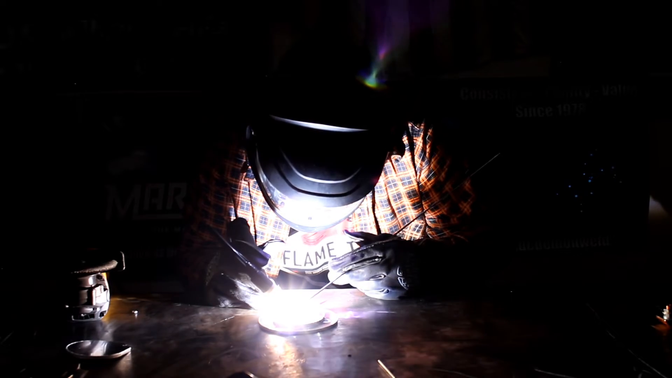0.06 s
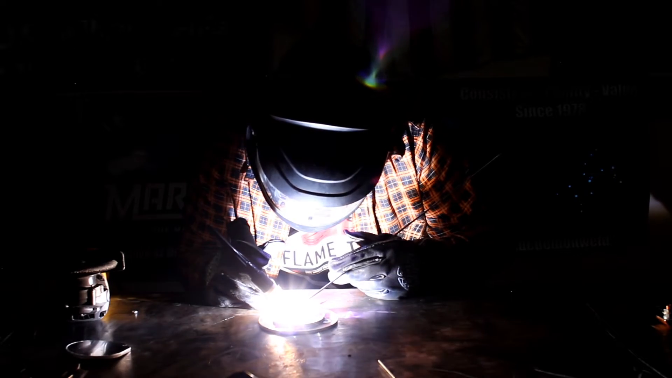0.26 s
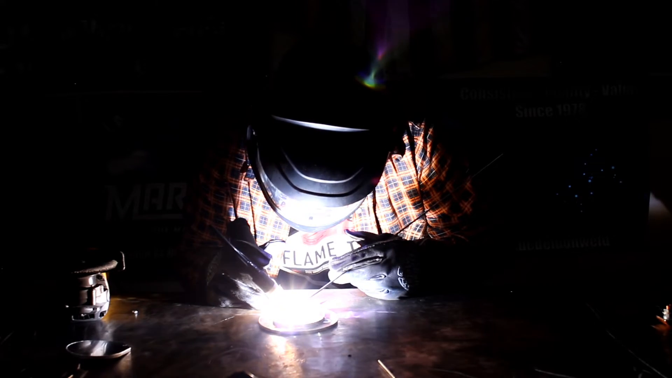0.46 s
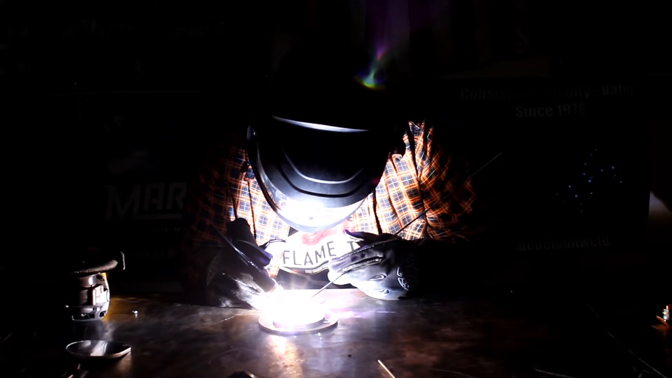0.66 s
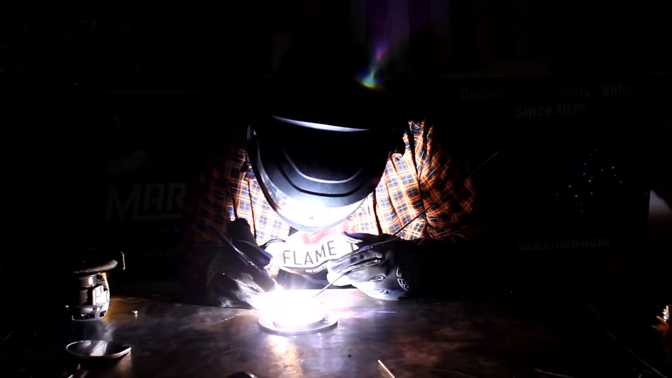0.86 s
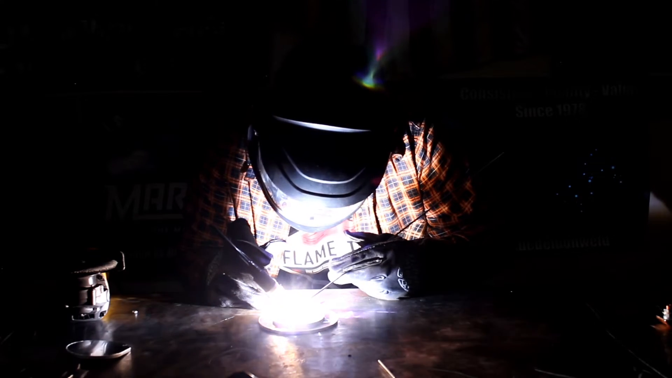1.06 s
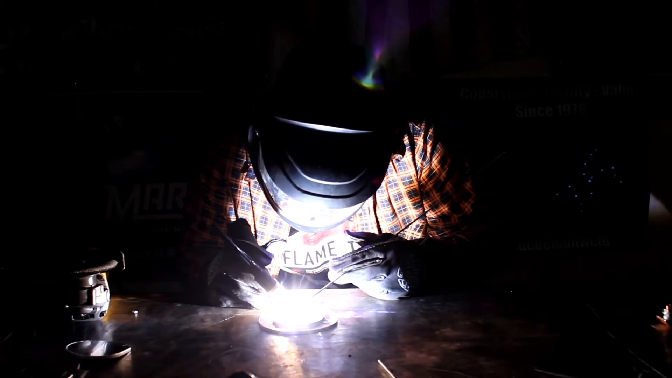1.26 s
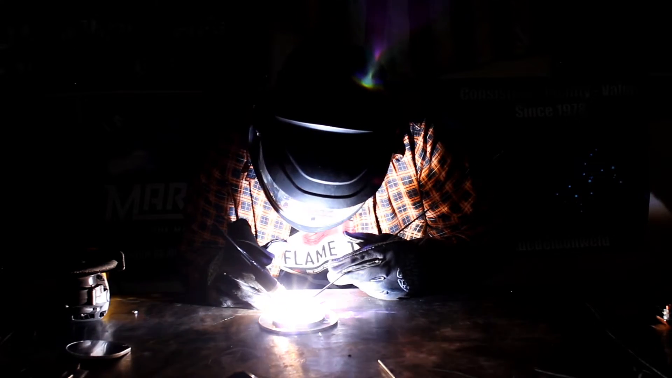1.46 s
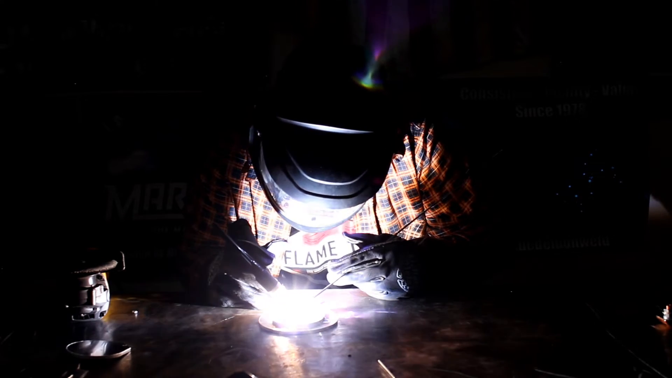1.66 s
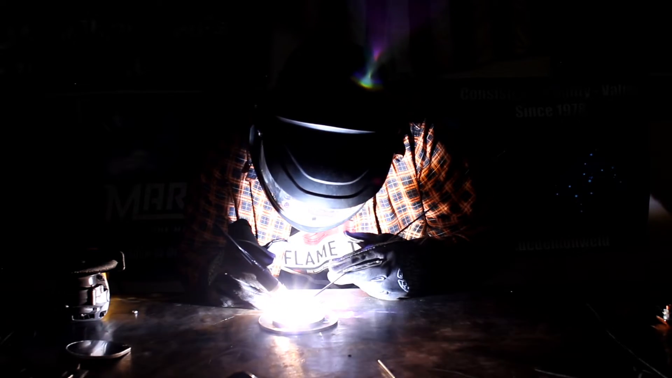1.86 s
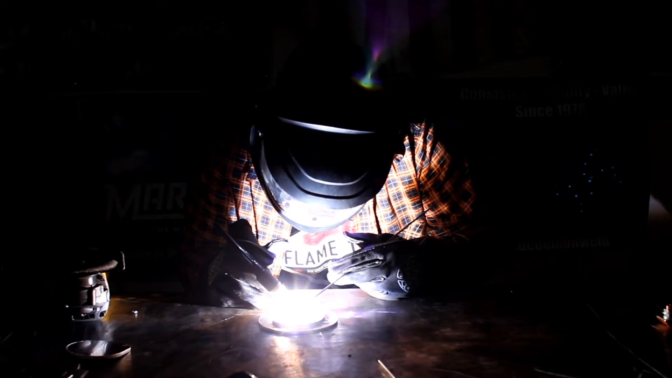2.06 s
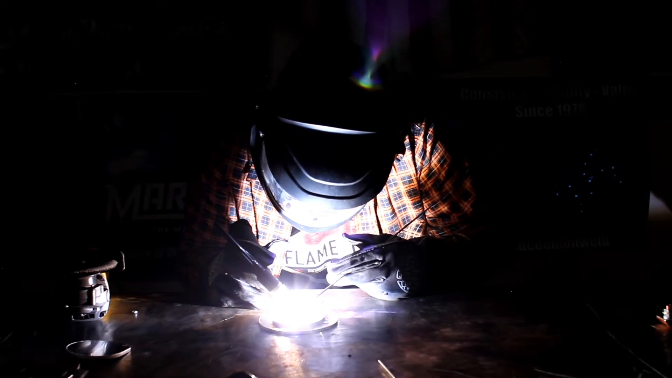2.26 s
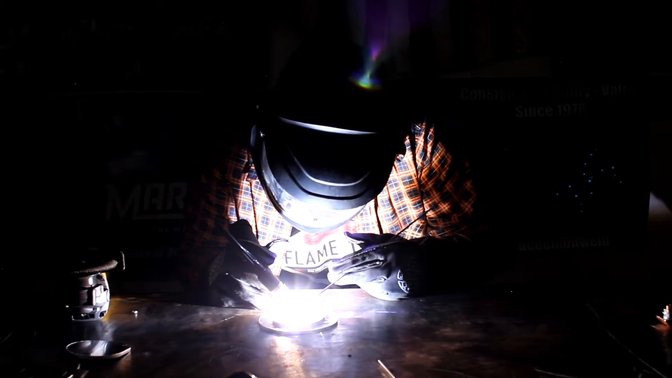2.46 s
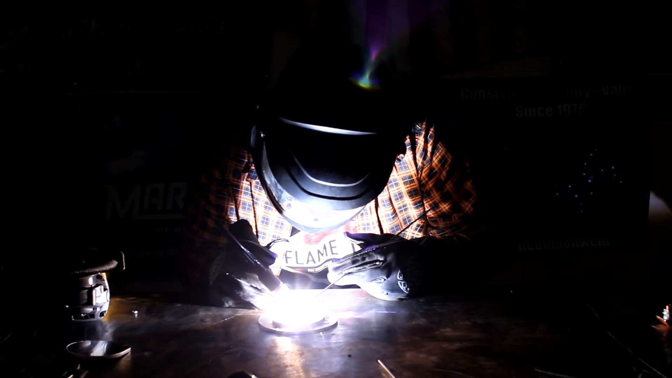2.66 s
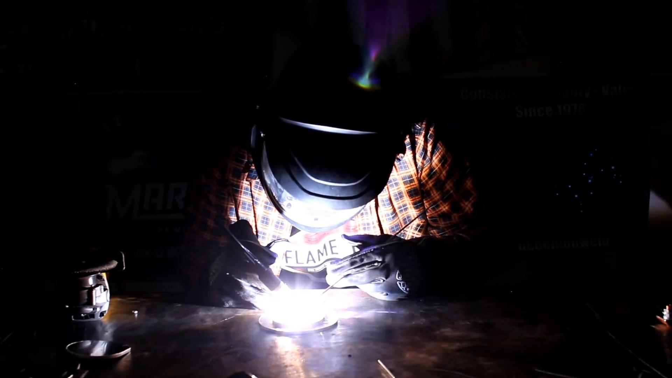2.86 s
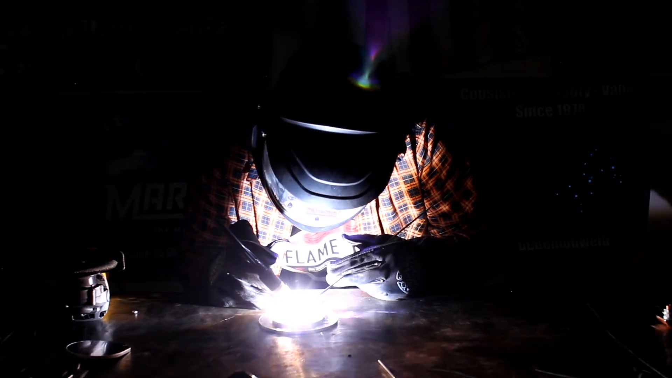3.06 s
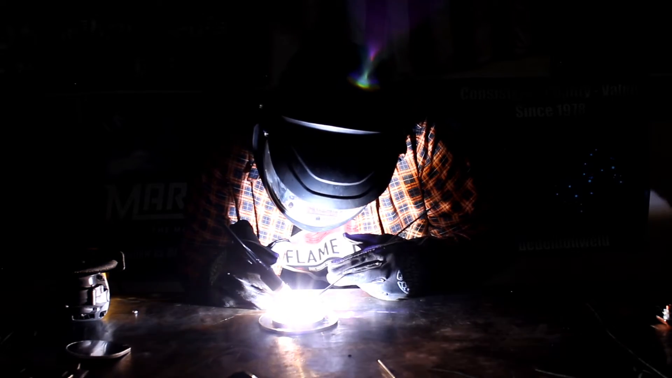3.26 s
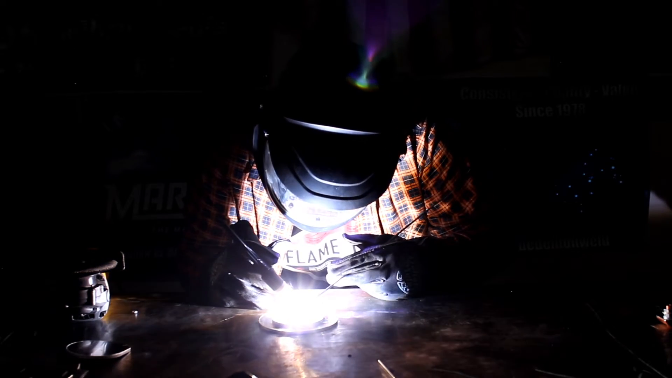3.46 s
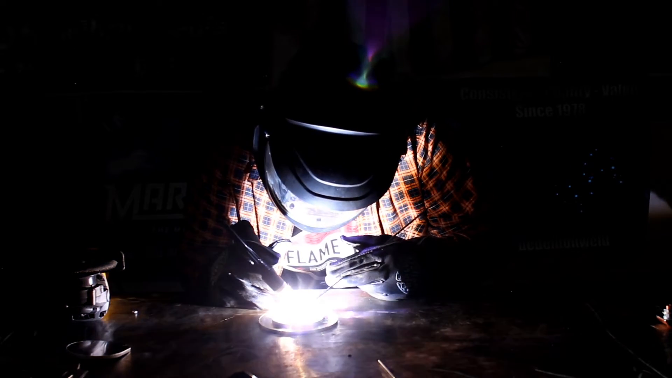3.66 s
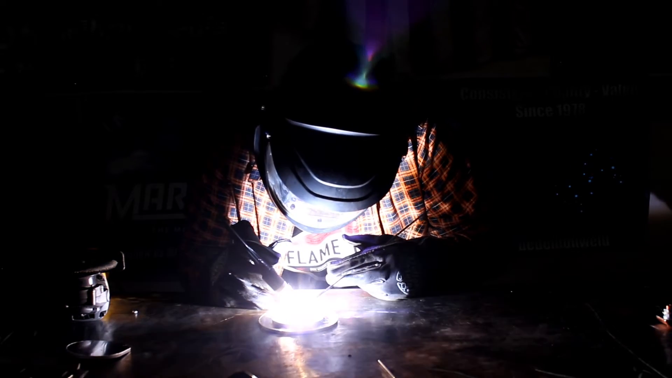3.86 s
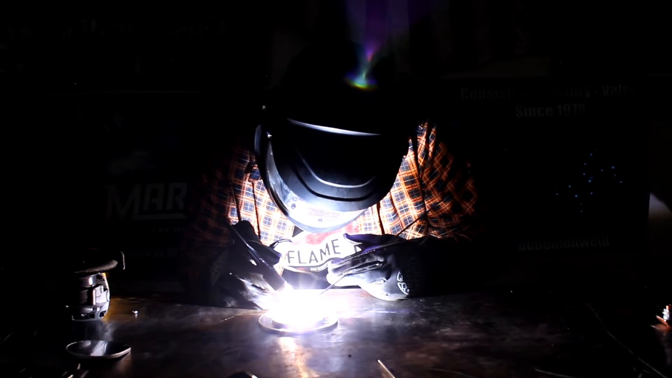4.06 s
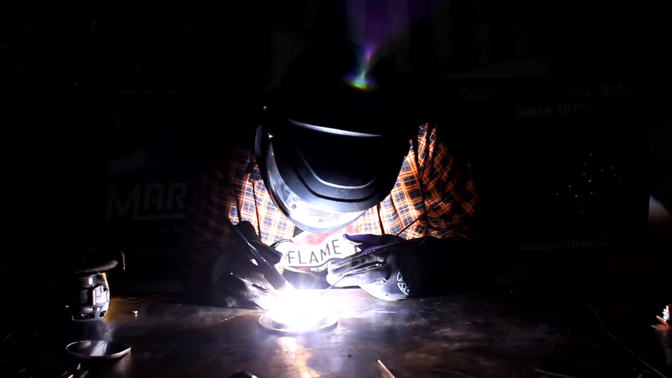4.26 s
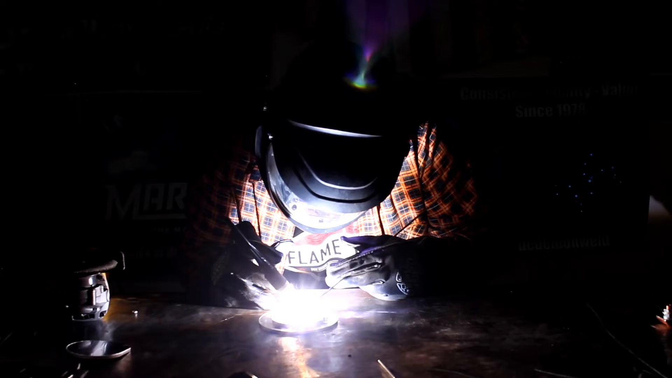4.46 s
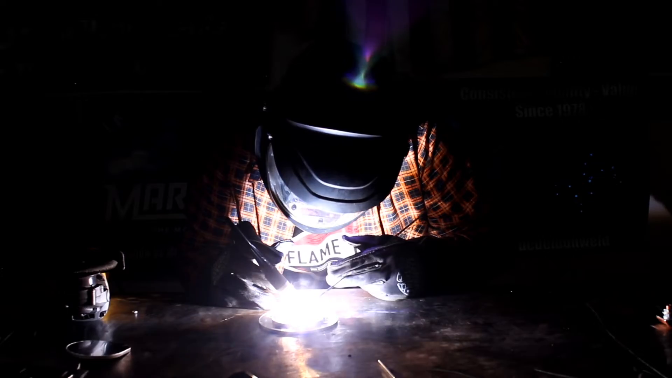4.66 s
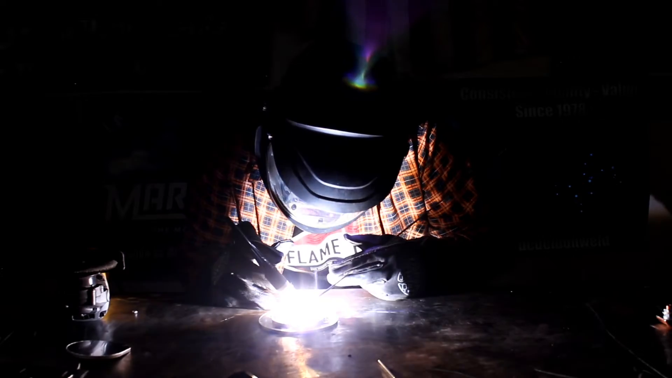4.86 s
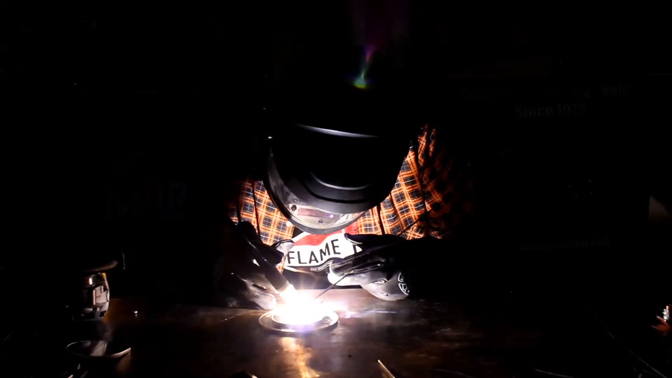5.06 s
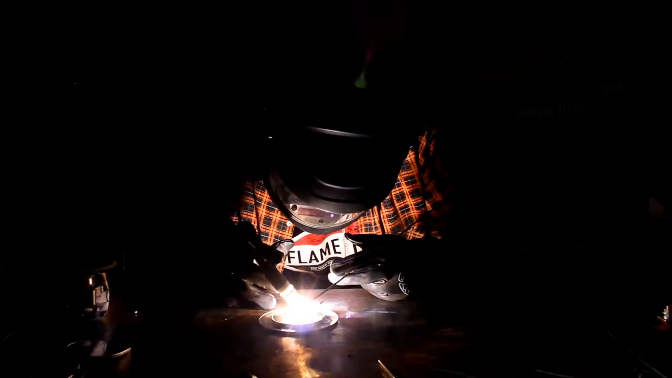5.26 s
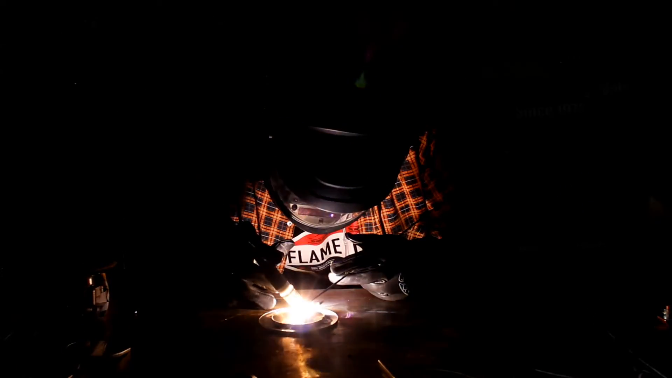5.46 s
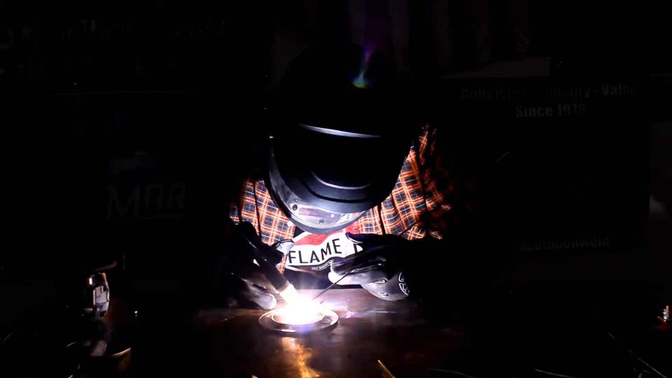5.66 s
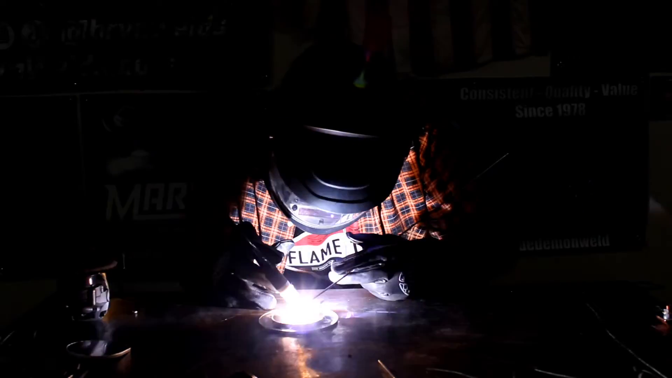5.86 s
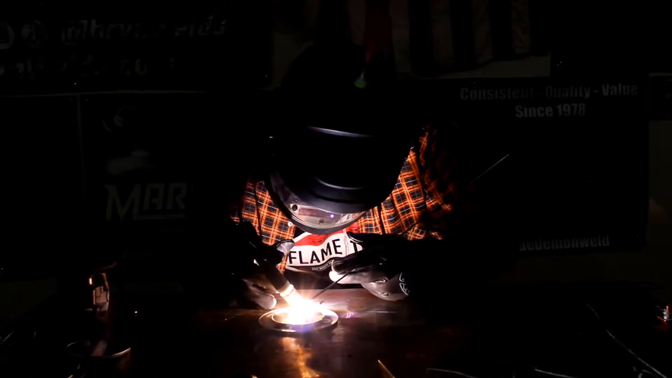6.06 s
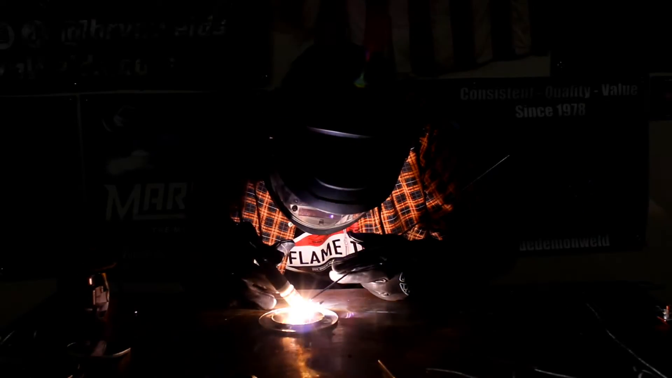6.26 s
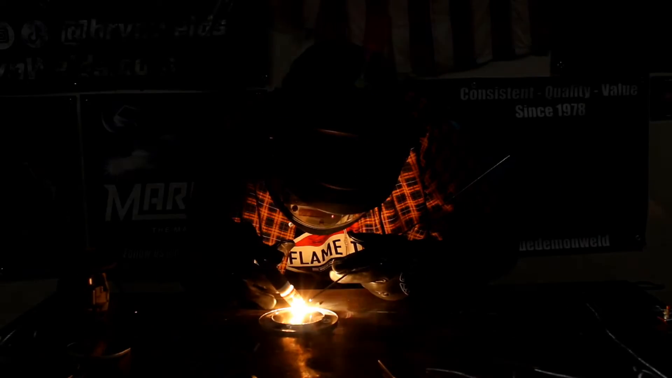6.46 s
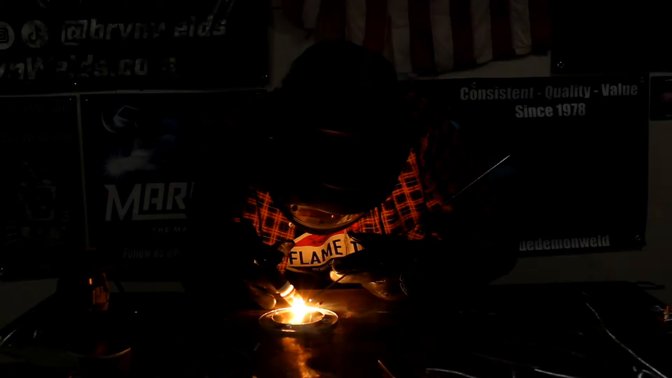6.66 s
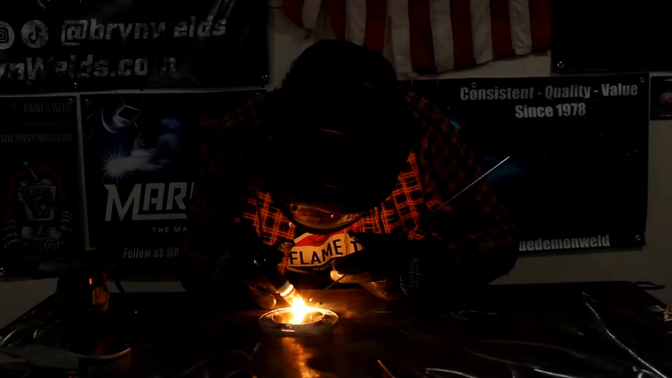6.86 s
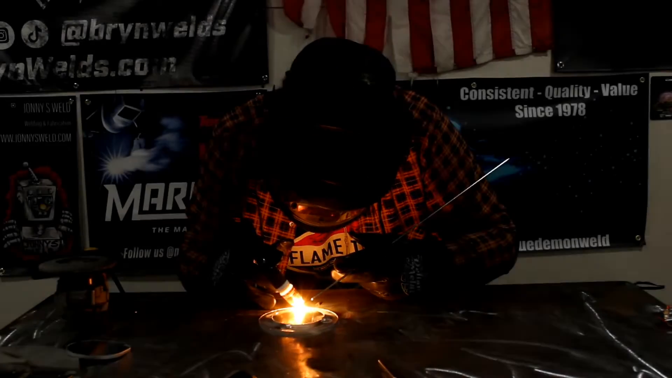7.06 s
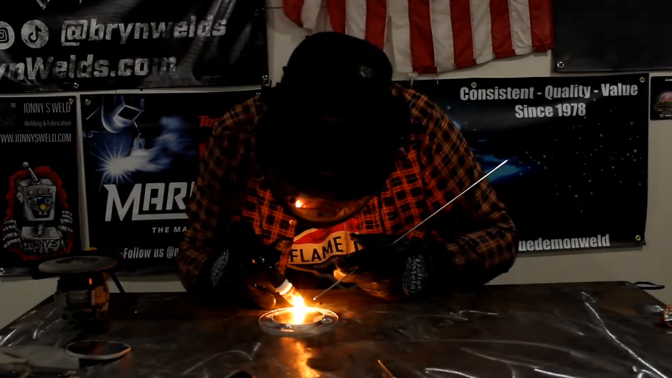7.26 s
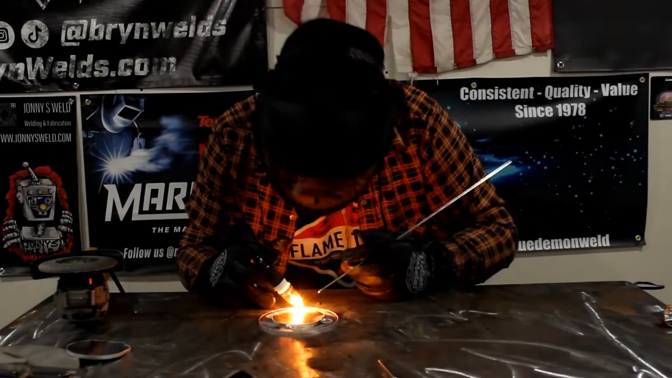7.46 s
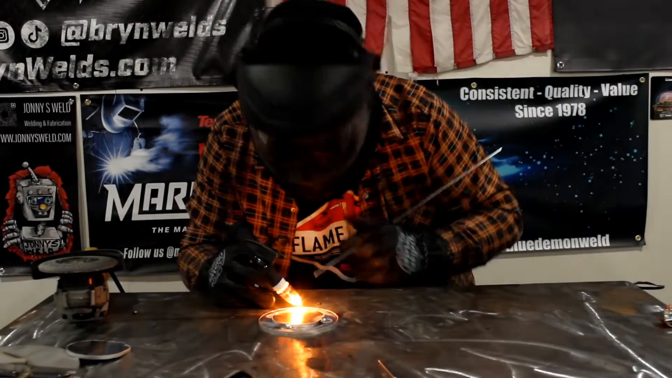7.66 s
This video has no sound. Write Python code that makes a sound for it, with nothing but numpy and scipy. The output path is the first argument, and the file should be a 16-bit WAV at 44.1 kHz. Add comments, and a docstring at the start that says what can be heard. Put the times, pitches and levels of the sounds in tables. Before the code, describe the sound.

Raspy electric welding buzz with crackling spits holds for five seconds, breaks into uneven snapping, cuts out, leaving a rising fan hum.

```python
"""AC welding arc and fan

An AC TIG arc buzzes on a steel bench, cracking at both polarity reversals of each 90 Hz cycle.
Filtered impulses make its cracks, decaying modes its rings and phase-locked harmonics its buzz.
Soft bumps sound on the bench, and the pool spits as the filler rod dips. As the current is eased
off, the arc sputters, restrikes with sharp snaps and goes out. Gain control, held down by the arc,
then lets a machine fan swell up: filtered noise for its rush, slightly unsteady sines for its hum."""
import sys
import numpy as np
from scipy import signal
from scipy.fft import rfft, irfft, next_fast_len
from scipy.io import wavfile
from scipy.ndimage import uniform_filter1d, minimum_filter1d, map_coordinates

SR = 44100
rng = np.random.default_rng(int(sys.argv[2]) if len(sys.argv) > 2 else 0)


def waveform_to_disk(signal):
    """Save audio, clipped to [-1, 1], as 16-bit WAV at the path in sys.argv[1]."""
    frames = np.transpose(np.atleast_2d(signal))
    scaled = np.clip(frames, -1, 1) * 32767
    samples = np.round(scaled).astype(np.int16)
    wavfile.write(sys.argv[1], SR, samples)


N = 340893

ARC_HZ = 90.19
GAIN_RANGE_DB = 16  # the most that the gain control can turn down
CRACK_LEAD_S = 0.0001497  # the crack opens each reversal
FADE_S = 0.133  # the arc's changes of state fade over this time

# the two changes of polarity within a cycle: t/s
POLARITY_CHANGES = [.0038, .0105]
# the torch passes the start, middle and end of the seam: t/s
SEAM_STATIONS = [0.436, 2.968, 5.01]
# spectrum of the spitting pool and the sizzle: f/Hz, relative level/dB
SPIT_SPECTRUM = [(60, -38), (200, -15.5), (550, 2), (900, -2), (1700, -1), (2600, -2.5), (5000, -0.5),
                 (8000, -7.5), (14000, -20)]
# spectrum of a sharp snap: f/Hz, relative level/dB
SNAP_SPECTRUM = [(100, -50), (600, -4), (1500, -2), (2800, 1), (4400, 2.5), (6500, 7.5), (8000, 4.5),
                 (10500, 0.5), (13000, -9), (16000, -3.5)]
# dips of the filler rod into the pool: t/s, relative spit level/dB, sag of the arc/dB, recovery/s
ROD_DIPS = [(0.497, 0, 2, 0.122), (1.0083, 4.5, 4, 0.104), (1.561, -3.5, 4, 0.063),
            (2.155, -16.5, 4, 0.0274), (2.5372, 3, 1.5, 0.04), (3.6682, 0.5, 0.5, 0.066),
            (4.19, -11, 0, 0.054)]
# restrikes of the failing arc: t/s, relative level/dB, number of snaps (1 or 2)
RESTRIKE_EVENTS = [(5.143, 0, 1), (5.1543, -6, 1), (5.1756, -5, 1), (5.2031, 2, 2), (5.2266, -3.5, 2),
                   (5.267, -6, 1), (5.3225, -4, 1), (5.338, -1.5, 1), (5.3498, -5, 1), (5.3573, -1.5, 1),
                   (5.4398, -4.5, 1), (5.4623, 1.5, 2), (5.5359, -6.5, 1), (5.574, 2.5, 1),
                   (5.5982, -0.5, 2), (5.6615, -9.5, 1), (5.699, 2, 1), (5.723, -0.5, 2), (5.819, -13, 1),
                   (5.834, -0.5, 1), (5.847, 0.5, 2), (5.9481, 1, 2), (5.971, -1, 2), (6.1337, -3, 1),
                   (6.238, -6, 1), (6.2908, -1.5, 1), (6.44, 2, 2)]


def amp(db):
    """Amplitude ratio of a level: 20 dB for each factor of ten."""
    return 10 ** (np.asarray(db) / 20)


def unit(x):
    """Normalisation: the signal divided by its rms value."""
    return x / np.sqrt(np.mean(x ** 2) + 1e-20)


def clock():
    """Uniform sampling: the time of every sample in seconds."""
    return np.arange(N) / SR


def along(points, hz):
    """Logarithmic frequency scale: (Hz, value) points interpolated on it."""
    f, v = np.transpose(points)
    return np.interp(np.log(hz + 1), np.log(f + 1), v)


def above(x, hz):
    """High-pass filtering: a second-order Butterworth filter removes the bass."""
    return signal.sosfilt(signal.butter(2, hz, "high", fs=SR, output="sos"), x)


def wobble(rate):
    """Band-limited fluctuation: a smooth curve through random knots, rate of them a second."""
    t = clock()
    coarse = t[::100]
    knots = rng.standard_normal(int(N * rate / SR) + 4)
    return np.interp(t, coarse, map_coordinates(knots, [coarse * rate]))


def ramp(start_s, length_s):
    """Linear envelope: a straight rise from 0 to 1."""
    return np.clip((clock() - start_s) / length_s, 0, 1)


def swell(crest_s, rise_s, fall_s):
    """Triangular envelope: a rise to 1 at the crest and a fall back to 0."""
    return ramp(crest_s - rise_s, rise_s) - ramp(crest_s, fall_s)


def coloured(x, spectrum):
    """Minimum-phase filtering: folding the cepstrum makes the given spectrum causal."""
    m = 2 * next_fast_len(N // 2 + 8192)
    cepstrum = irfft(np.log(amp(along(spectrum, np.fft.rfftfreq(m, 1 / SR)))), m)
    cepstrum[1:m // 2] *= 2
    cepstrum[m // 2 + 1:] = 0
    return irfft(rfft(x, m) * np.exp(rfft(cepstrum)), m)[:N]


def pulses(times, sizes):
    """Band-limited impulses: windowed sinc functions centred between samples."""
    at = times[:, None] * SR
    taps = np.floor(at).astype(int) + np.arange(-7, 9)
    shape = np.sinc(taps - at) * np.cos(np.pi * (taps - at) / 16) ** 2
    inside = (taps >= 0) & (taps < N)
    return np.bincount(taps[inside], (sizes[:, None] * shape)[inside], N)


def workshop(x, scatter_db, tail_db, scatter_s=0.0028):
    """Room response: direct sound, echoes, scatter off the work piece and a reverberant tail."""
    # reflections off bench, mask and nearby walls: delay/s, gain
    reflections = [(.00045, 0.17), (.0009, 0.071), (.0014, -0.27), (.00178, 0.26), (.0047, -0.15),
                   (.0091, 0.51)]
    # reverberation of the room: f/Hz, decay time by 60 dB/s
    decay_times = [(200, 0.18), (2000, 0.72), (5000, 0.62), (9000, 0.42), (14000, 0.3)]
    size = SR // 2
    delay, gain = np.transpose(reflections)
    near = pulses(np.r_[0, delay], np.r_[1, gain])[:size]
    scatter = rng.standard_normal(size) * (np.arange(size) < scatter_s * SR)
    # each frequency band of the tail dies away at its own rate
    hz, t, z = signal.stft(rng.standard_normal(size), SR, nperseg=256)
    decay = amp(-60 * t / along(decay_times, hz)[:, None])
    tail = signal.istft(z * decay, SR)[1][:size]
    response = near + amp(scatter_db) * scatter / np.linalg.norm(scatter)
    response = response + amp(tail_db) * tail / np.linalg.norm(tail)
    return signal.fftconvolve(x, response)[:N]


def travelling(x, scatter_db, tail_db):
    """Moving source: one pattern of reflections melts into the next as the torch follows the seam."""
    shares = [np.interp(clock(), SEAM_STATIONS, here) for here in np.eye(len(SEAM_STATIONS))]
    mix = sum(share * unit(workshop(x, scatter_db, tail_db)) for share in shares)
    return unit(mix / np.linalg.norm(shares, axis=0))


def cycles(restarts):
    """Periodicity: the start of each current cycle, counted afresh from every restart."""
    spans = zip(restarts, restarts[1:])
    return np.concatenate([np.arange(a, b, 1 / ARC_HZ) for a, b in spans])


def reversals(starts, second_db, spread_db, jitter_s):
    """Reignition at each change of polarity: two negative pulses a cycle."""
    times = starts[:, None] + POLARITY_CHANGES
    sizes = amp([0, second_db] + spread_db * rng.uniform(-1, 1, times.shape))
    jittered = times + jitter_s * rng.standard_normal(times.shape)
    return pulses(jittered.ravel(), -sizes.ravel())


def bursts(beat, second_db, spread_db, decay_s):
    """Exponential decay: the envelope of a brief flare after each reversal."""
    flare = np.exp(-np.arange(SR // 100) / SR / decay_s)
    struck = reversals(beat, second_db, spread_db, 0)
    return unit(np.abs(signal.fftconvolve(struck, flare)[:N]))


def cracks(beat):
    """Impulsive radiation: each reversal sends a filtered pressure pulse into the room."""
    # spectrum of a crack: f/Hz, relative level/dB
    crack_spectrum = [(40, -65.5), (90, -48.5), (150, -54), (300, -54.5), (560, -1), (900, -14),
                      (1250, -6.5), (1700, -1), (2500, -0.5), (3300, -1.5), (3650, -4.5), (4050, -4.5),
                      (4450, -1.5), (4900, -2.5), (5400, -0.5), (6300, -1), (7100, 6), (8000, 3),
                      (9700, -4), (13000, -6.5), (15500, -13.5)]
    struck = reversals(beat - CRACK_LEAD_S, second_db=-4, spread_db=2, jitter_s=1.2e-5)
    return travelling(coloured(struck, crack_spectrum), scatter_db=-3, tail_db=-3)


def sharp_edge(beat):
    """Impulsive radiation: a snap of slightly uneven strength at every second reversal."""
    jitter = 6e-6 * rng.standard_normal(len(beat))  # seconds
    times = beat + POLARITY_CHANGES[1] - CRACK_LEAD_S + jitter
    struck = pulses(times, amp(1.2 * rng.standard_normal(len(beat))))
    return travelling(coloured(struck, SNAP_SPECTRUM), scatter_db=-5, tail_db=-6)


def sizzle(beat):
    """Amplitude modulation: noise gated by short flares on the beat of the reversals."""
    noise = rng.standard_normal(N) * bursts(beat, second_db=0, spread_db=4.5, decay_s=0.0008)
    in_room = unit(workshop(coloured(noise, SPIT_SPECTRUM), scatter_db=-6, tail_db=-4))
    return in_room * amp(0.54 * wobble(12))


def ringing(beat):
    """Modal resonance: each reversal rings torch cup and work piece; the colour shifts along the seam."""
    # modes: f/Hz, 60 dB decay/s, relative level at first and second reversal/dB, drift/dB per s
    modes = [(1500, .008, -52, -47, 2), (2480, .012, -43, -50, -1.4), (4460, .01, -43, -43, 2.8),
             (5250, .008, -44, -45, -1.2), (6050, .008, -44, -43, -.4), (6520, .008, -47, -42, 1.6),
             (8100, .006, -45, -42.5, .4)]
    t, age, out = clock(), np.arange(SR // 40) / SR, np.zeros(N)
    struck = []
    for s in POLARITY_CHANGES:
        jitter = 1.5e-5 * rng.standard_normal(len(beat))  # seconds
        struck.append(pulses(beat + s + jitter, amp(1.5 * rng.standard_normal(len(beat)))))
    first, second = struck
    for hz, t60, first_db, second_db, db_per_s in modes:
        mode = np.sin(2 * np.pi * hz * age) * amp(-60 * age / t60)
        blows = amp(second_db) * second - amp(first_db) * first
        rung = unit(above(signal.fftconvolve(blows, mode)[:N], hz / 2))
        level = np.hypot(amp(first_db), amp(second_db))
        out += rung * level * amp(db_per_s * (t - SEAM_STATIONS[1]) + 0.49 * wobble(5))
    return out


def buzz(hum, flares, throb, drift_db):
    """Fourier synthesis: harmonics favoured by bench and room; the upper ones throb at the reversals."""
    # harmonics at mid seam, recoloured as the torch moves: multiple, relative level/dB, drift/dB per s
    harmonics = [(1, -68.5, .5), (2, -45, .2), (3, -45.5, 0), (4, -43.5, .4), (5, -33, -.2), (6, -36, -.5),
                 (7, -28.7, -.1), (8, -35.7, .3), (11, -40.7, -.1), (15, -46, 0), (19, -45, 1.1),
                 (20, -46, -.3), (22, -35.5, -.3), (25, -36.5, -.8), (26, -42.5, -1), (28, -33.8, -1.2),
                 (39, -40.5, 0), (41, -42, 1.4), (49, -42.5, 1.3), (50, -45, 2), (57, -41, -1.3),
                 (59, -41, -.2), (62, -42, 1), (65, -41, .2), (67, -36, -.6), (72, -37.5, 1.1),
                 (73, -42, 2), (88, -40.5, -.9), (90, -40.5, .4)]
    hum_lag_s = 0.000741  # the low harmonics trail each reversal
    t, low, high = clock(), np.zeros(N), np.zeros(N)
    sway = t + 1.5e-5 * wobble(4.552)  # the arc wanders on the pool
    for order, db, db_per_s in harmonics:
        hz, deep = order * ARC_HZ, order < 16
        # negative peaks gather at the reversals, a little late by way of the bench
        late_s = hum_lag_s if deep else rng.uniform(0, 0.0003073)
        weights = [.9, 1] if deep else [1, .7]  # first and second reversal
        lead = np.angle(-np.exp(-2j * np.pi * hz * (np.array(POLARITY_CHANGES) + late_s)) @ weights)
        level = amp(db + db_per_s * (t - SEAM_STATIONS[1]) + drift_db * wobble(6.02))
        line = np.sqrt(2) * level * np.cos(2 * np.pi * hz * sway + lead)
        if deep:
            low += line
        else:
            high += line
    throbbing = high * unit(1 + throb * (flares - 1))
    return hum * (low + amp(0.5) * above(throbbing, 479))


def rod_db():
    """Gain envelope: the arc swells as the rod comes near, sags as it dips, then recovers."""
    near_db, near_s, sag_s = 1, 0.13, 0.033  # sag_s: from the dip to the deepest sag
    return sum(near_db * swell(s, near_s, sag_s) - sag_db * swell(s + sag_s, sag_s, recovery_s)
               for s, _, sag_db, recovery_s in ROD_DIPS)


def full_arc():
    """Periodic excitation: cracks, rings, harmonics, a sharp edge and a sizzle share one beat."""
    # the welding current, eased off at the end: t/s, relative level/dB
    current = [(0, -0.5), (1.3, 0), (2.498, 1), (4.096, 0), (4.85, -2), (4.999, -4), (5.1, -3.5),
               (5.17, -16.5)]
    crack_follows = 0.52  # dB lost by cracks and rings per dB of current
    current_db = np.interp(clock(), *np.transpose(current))
    unrest_db = rod_db() + 0.55 * wobble(16)  # the arc is never quite still
    hum = amp(current_db + unrest_db)
    crack = amp(crack_follows * current_db + unrest_db)
    # as the arc lengthens, its second reversal hardens into a sharp edge
    length = (1 + np.tanh((clock() - 4.59) / 0.131)) / 2
    short_edge_db, long_edge_db = -30, -27
    edge = amp(short_edge_db + (long_edge_db - short_edge_db) * length + unrest_db)
    beat = cycles([0, N / SR])
    flares = bursts(beat, second_db=-2, spread_db=3, decay_s=0.0018)
    lines = buzz(hum, flares, throb=0.582, drift_db=1.0744)
    rough = cracks(beat) + amp(-4.5) * sizzle(beat)
    rough = rough * amp(1 * length)  # 1 dB stronger in the long arc
    total = amp(-0.76) * lines + crack * (amp(-26) * rough + ringing(beat)) + edge * sharp_edge(beat)
    full_ends_s = 5.14
    return (1 - ramp(full_ends_s, FADE_S)) * total


def machine(rush_db, whine_db, waver):
    """Broadband and tonal fan noise: filtered noise for the rush, unsteady sines for the tones."""
    # spectrum of the rush: f/Hz, relative level/dB
    fan_spectrum = [(30, -20), (70, -25.5), (130, -7.5), (230, 1), (480, 2), (620, 8.5), (760, 2),
                    (1000, -0.5), (1230, -1), (1600, -4), (2200, -8.5), (2550, -6.5), (3200, -13),
                    (3700, -13), (4700, -19.5), (6800, -20.5), (7150, -23), (7500, -20.5), (8600, -26),
                    (9100, -22.5), (9800, -28.5), (11300, -34), (12100, -29), (12800, -33), (13700, -24),
                    (14500, -23), (15300, -32.5)]
    # machine tones: f/Hz, relative level/dB, later change of level/dB
    fan_tones = [(397, -44.5, 1.5), (421, -39.5, 7), (615.75, -30, 1.5), (649, -38, -0.5), (1244, -50, 0),
                 (1314, -45.5, 4.5), (1690, -57.5, -2), (1849, -44, 0)]
    t, grown = clock(), ramp(7.22, 0.524)
    rush = unit(coloured(rng.standard_normal(N), fan_spectrum)) * amp(0.23 * wobble(8))
    tones = np.zeros(N)
    for hz, db, growth_db in fan_tones:
        level = amp(db + growth_db * grown + 1 * wobble(19))
        tones += level * np.sin(2 * np.pi * hz * t + waver * wobble(8.2))
    return amp(rush_db) * rush + amp(whine_db) * np.sqrt(2) * tones


def sparks(rows, spectrum, lag_s, scatter_db, tail_db):
    """Impulse response: each (s, dB) event is one filtered pressure pulse into the room."""
    s, db = np.transpose(rows)
    return workshop(coloured(pulses(s + lag_s, amp(db)), spectrum), scatter_db, tail_db)


def bumps():
    """Impact excitation: soft bumps sound the dull body of the bench."""
    # bumps on the bench: t/s, relative level/dB
    bump_events = [(0.175, 5.5), (0.248, 1.5)]
    # the bench's dull body: f/Hz, relative level/dB
    bench_spectrum = [(50, -32), (130, -11.5), (220, -8), (350, -2.5), (700, 0), (1200, -19.5),
                      (3000, -41.5)]
    return sparks(bump_events, bench_spectrum, lag_s=0, scatter_db=-5, tail_db=12)


def spits():
    """Impulsive scattering: the pool spits once at each dip of the rod."""
    rows = [(s, db) for s, db, *_ in ROD_DIPS]
    return sparks(rows, SPIT_SPECTRUM, lag_s=.002, scatter_db=8.5, tail_db=2.0)


def restrikes():
    """Spark discharge: each restrike snaps once, or again as strongly at the next reversal."""
    second_snap_s = 0.0072
    strikes = [(s + k * second_snap_s, db) for s, db, count in RESTRIKE_EVENTS for k in range(round(count))]
    return sparks(strikes, SNAP_SPECTRUM, lag_s=.0013, scatter_db=-5, tail_db=-4)


def puffs(beat):
    """Impulsive radiation: weak reversals give dull pulses, uneven in time and strength."""
    # spectrum of a puff: f/Hz, relative level/dB
    puff_spectrum = [(60, -44), (170, -15), (320, -6.5), (560, 0.5), (750, -1.5), (1000, -10.5), (1500, -5),
                     (2200, -21), (8000, -33)]
    struck = reversals(beat, second_db=-8.5, spread_db=4.5, jitter_s=0.0004)
    return unit(workshop(coloured(struck, puff_spectrum), scatter_db=-14, tail_db=-6))


def ticks(beat):
    """Impulsive radiation: weak reversals also give bright, well-timed pulses."""
    # spectrum of a tick: f/Hz, relative level/dB
    tick_spectrum = [(100, -43), (400, -7.5), (900, 1), (1600, 5), (2500, -6), (3700, 8.5), (4600, 0),
                     (5600, 7), (8000, 5), (9500, -0.5), (13000, -1.5), (16000, -14)]
    struck = reversals(beat, second_db=-9, spread_db=2.5, jitter_s=1e-5)
    return unit(workshop(coloured(struck, tick_spectrum), scatter_db=-6, tail_db=-5))


def wavering(lines, waver):
    """Phase modulation: tones from (Hz, dB) rows, each with an unsteady phase."""
    return np.sqrt(2) * sum(amp(db) * np.sin(2 * np.pi * hz * clock() + waver * wobble(14))
                            for hz, db in lines)


def starved_arc():
    """Irregular excitation: reversals at low current shrink to puffs, weak hum, thin rasp and ticks."""
    # the arc twice gathers strength and collapses: t of the crest/s, gain/dB, collapse/s
    surges = [(6.15, 9.5, 0.087), (6.36, 9, 0.118)]
    # the cycle starts afresh after these interruptions: t/s
    restarts = [5.0, 5.208, 5.355, 5.467, 5.579, 5.704, 5.852, 5.980, 6.237, 6.5]
    # tones that ring on at low current: f/Hz, relative level/dB
    rasp_tones = [(271, -47.5), (541, -37.5), (631, -39), (1082, -40.5), (1351, -36), (1443, -42.5),
                  (1534, -37.5), (1620, -38), (1803, -34), (1894, -54), (1986, -45.5), (2977, -52.5),
                  (3607, -46.5), (3697, -45.5)]
    # weak hum while the arc sputters: f/Hz, relative level/dB
    hum_tones = [(180.4, -67.5), (361, -48.5), (541, -46.5), (631, -45), (992, -47.5), (1443, -47),
                 (1803, -52.5), (1894, -65.5), (1984, -47.5)]
    surge_db = sum(db * swell(s, 0.185, collapse_s) for s, db, collapse_s in surges)
    # the puffs falter after a double snap
    falter_in_s, falter_out_s = 0.031, 0.072
    falter = np.max([swell(s + falter_in_s, falter_in_s, falter_out_s)
                     for s, _, count in RESTRIKE_EVENTS if round(count) == 2], axis=0)
    # the sputtering stops: puffs weaken, hum gives way to rasp
    settled = ramp(5.97, FADE_S)
    # puffs and ticks gain 0.15 and 1.195 dB per dB of surge
    puff_gain = amp(-38.5 - 3 * falter - 3 * settled + 0.15 * surge_db)
    rasp_gain = amp(-41 + surge_db) * settled
    tick_gain = amp(-43.5 + 1.195 * surge_db)
    beat = cycles(restarts)
    flares = bursts(beat, second_db=-7, spread_db=4, decay_s=0.0015)
    throb = unit(1 + 0.55 * (flares - 1))
    floor_hz = 239  # rasp and hum have no bass
    rasp = above(unit(wavering(rasp_tones, waver=0.93)) * throb, floor_hz)
    hum = above(wavering(hum_tones, waver=0.816) * throb, floor_hz) * (1 - settled)
    starves_s, out_s = 5.2, 6.43  # low current fully in, arc starts to go out
    alight = ramp(starves_s - FADE_S, FADE_S) - ramp(out_s, FADE_S)
    return alight * (puff_gain * puffs(beat) + hum + rasp_gain * rasp + tick_gain * ticks(beat))


def notched(x):
    """Destructive interference: the bounce off the bench cancels a few narrow bands."""
    # centres of the cancelled bands: f/Hz
    notch_centres = [7350, 9400]
    sections = [np.r_[signal.iirnotch(hz, hz / 220, SR)] for hz in notch_centres]  # 220 Hz wide
    return signal.sosfilt(sections, x)


def scene():
    """Superposition: the arc, far louder than the machine behind it."""
    arc = notched(full_arc() + starved_arc() + restrikes() + spits()) + bumps()
    return (amp(GAIN_RANGE_DB) * arc + machine(rush_db=-27.5, whine_db=-1.5, waver=0.19))[None]


def gain_control(x, threshold_db, hold_s, release_db_per_s):
    """Dynamic compression: peaks push the gain down; it waits, then climbs back steadily in dB."""
    over = np.clip(20 * np.log10(np.abs(x[0]) + 1e-9) - threshold_db, 0, GAIN_RANGE_DB)
    ahead = -minimum_filter1d(-over, size=1024)  # the gain is down just before a peak
    half = int(hold_s * SR / 2)
    held = -minimum_filter1d(-ahead, 2 * half + 1, origin=half)
    climb = release_db_per_s * clock()
    cut = np.maximum.accumulate(held + climb) - climb
    return x * amp(-uniform_filter1d(cut, size=256))


def record(dry):
    """Compression and band limitation: gain control, then nothing at or above 15.8 kHz."""
    x = gain_control(dry, threshold_db=-10, hold_s=.2, release_db_per_s=34)
    m = next_fast_len(N + 8192)
    passed = np.fft.rfftfreq(m, 1 / SR) < 15800
    return irfft(rfft(x, m) * passed, m)[..., :N]


dry = scene()
out = record(dry)
waveform_to_disk(out)
```